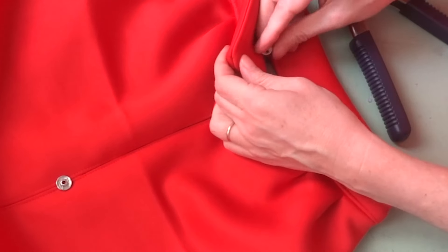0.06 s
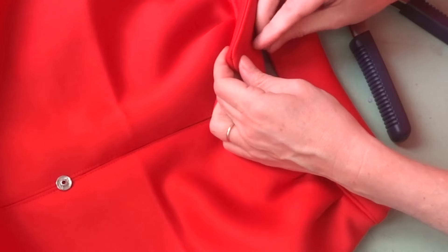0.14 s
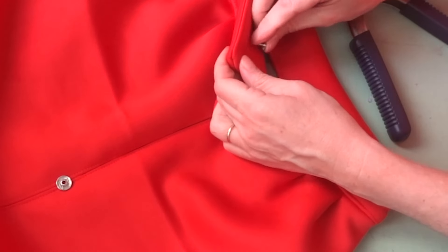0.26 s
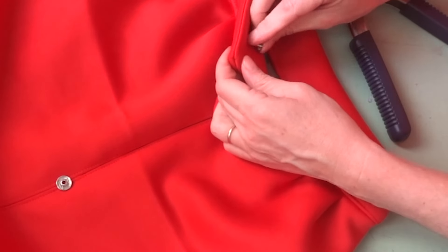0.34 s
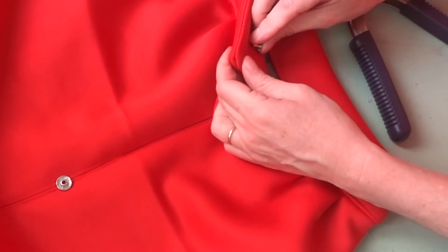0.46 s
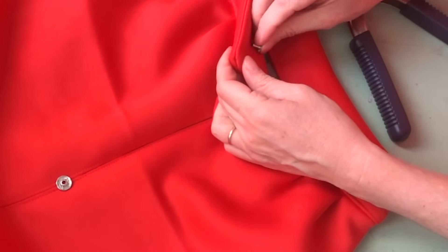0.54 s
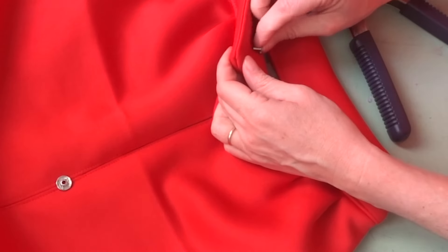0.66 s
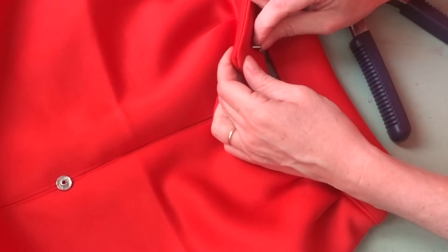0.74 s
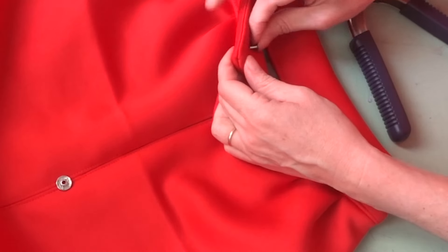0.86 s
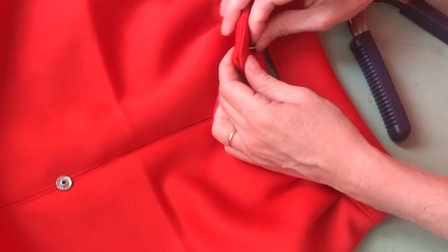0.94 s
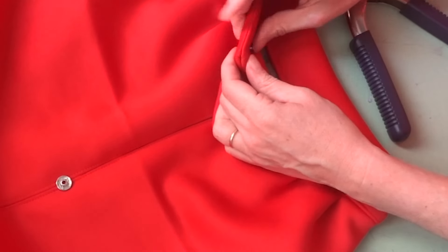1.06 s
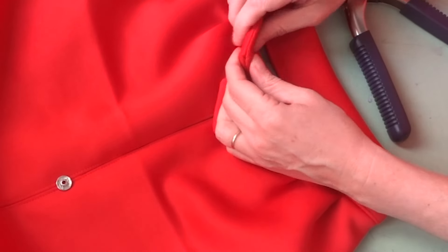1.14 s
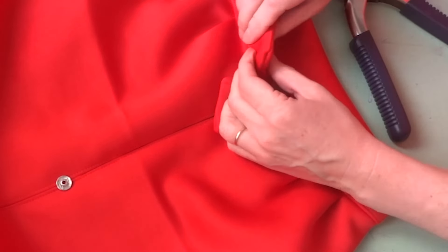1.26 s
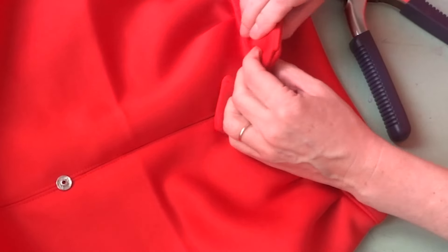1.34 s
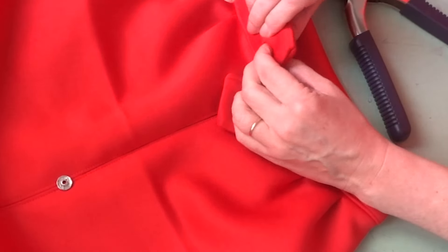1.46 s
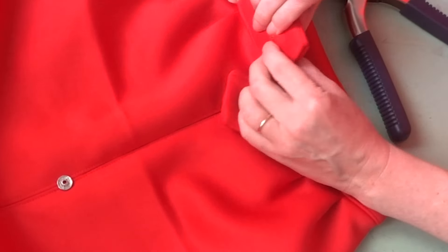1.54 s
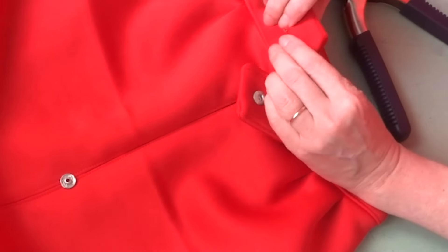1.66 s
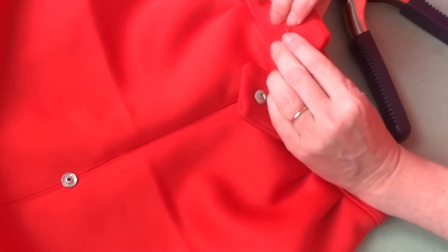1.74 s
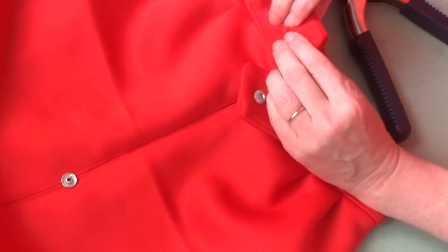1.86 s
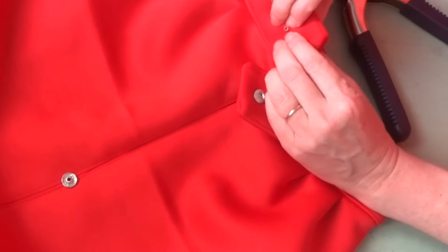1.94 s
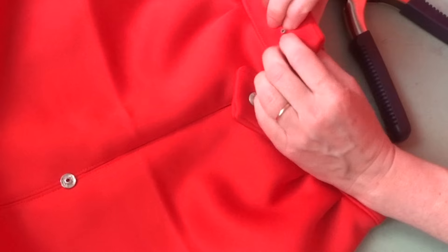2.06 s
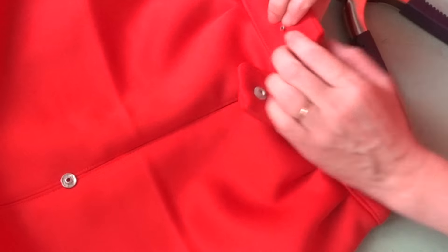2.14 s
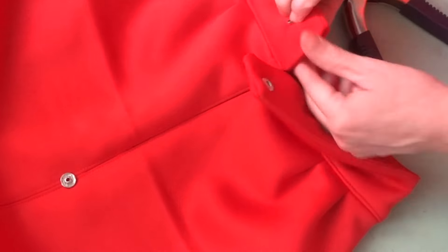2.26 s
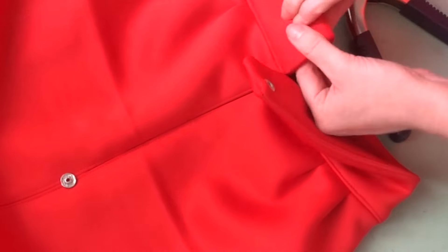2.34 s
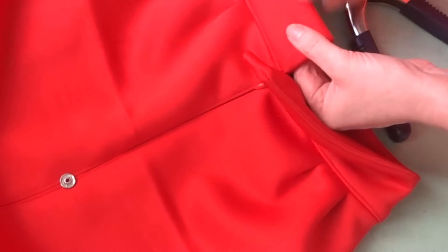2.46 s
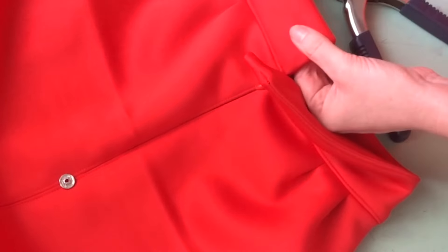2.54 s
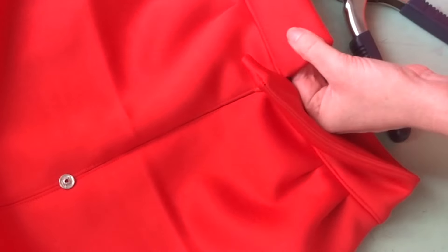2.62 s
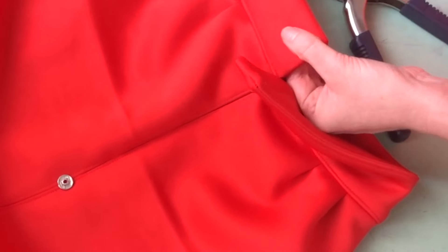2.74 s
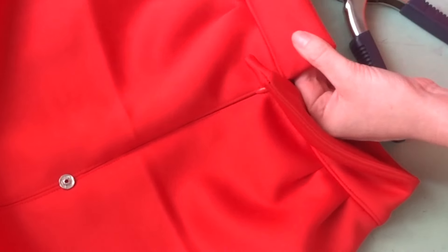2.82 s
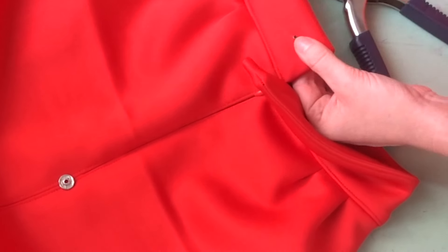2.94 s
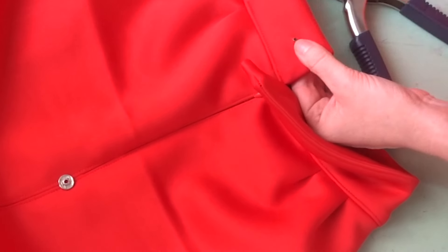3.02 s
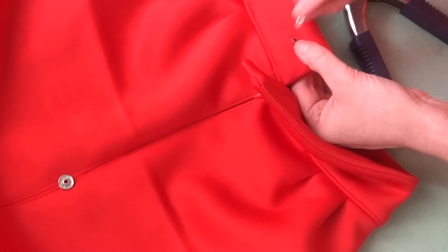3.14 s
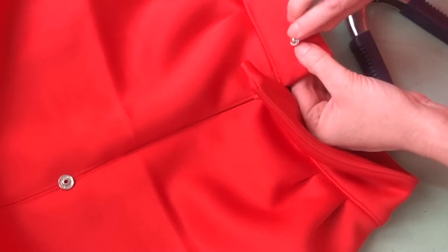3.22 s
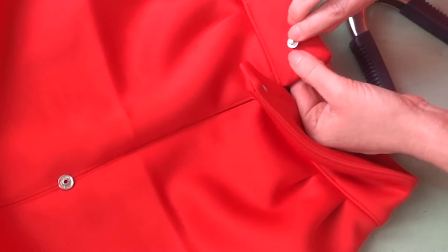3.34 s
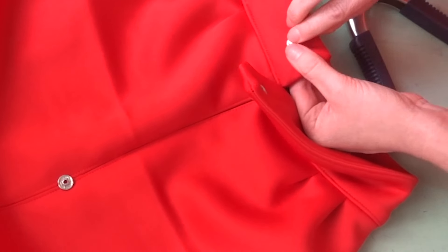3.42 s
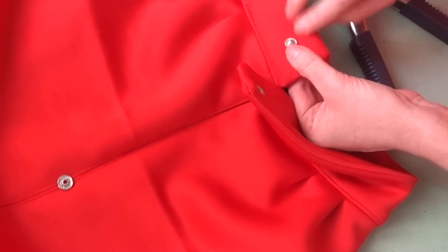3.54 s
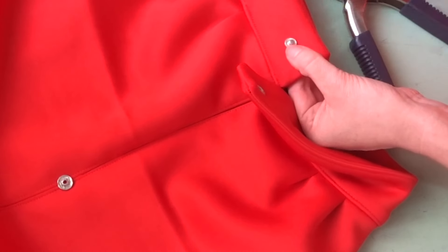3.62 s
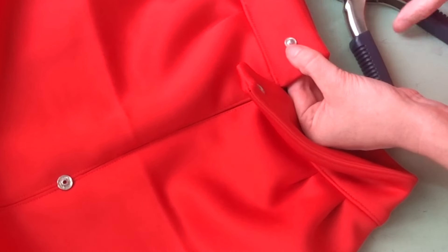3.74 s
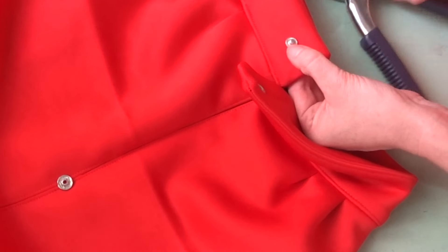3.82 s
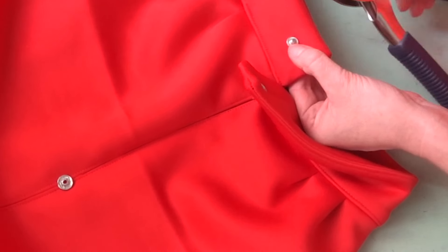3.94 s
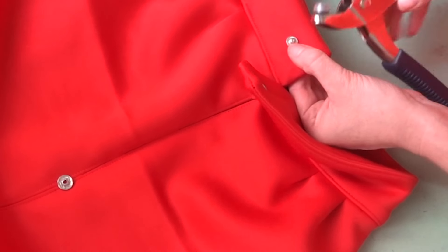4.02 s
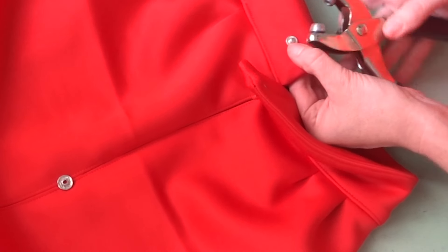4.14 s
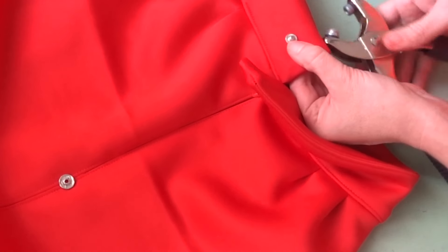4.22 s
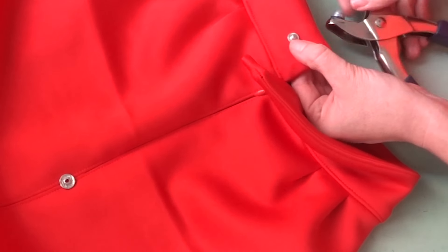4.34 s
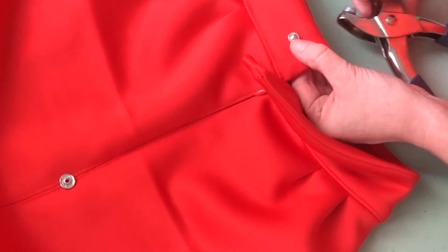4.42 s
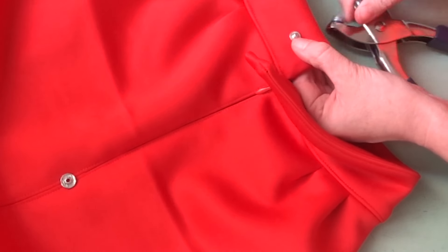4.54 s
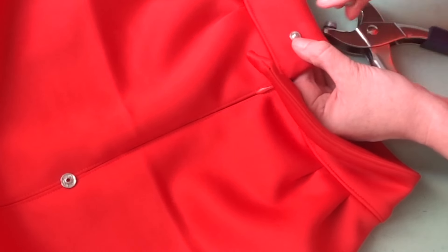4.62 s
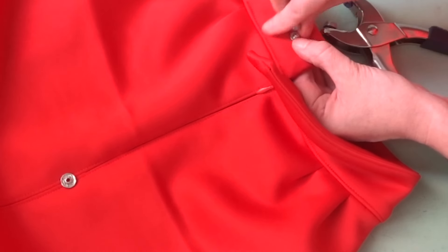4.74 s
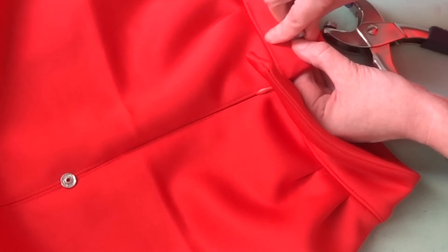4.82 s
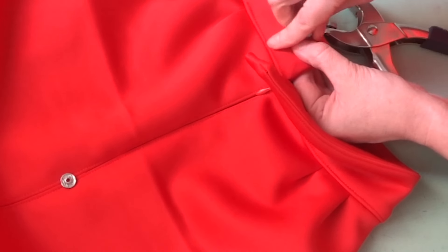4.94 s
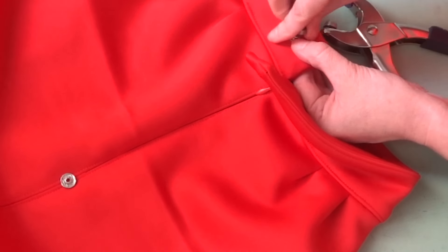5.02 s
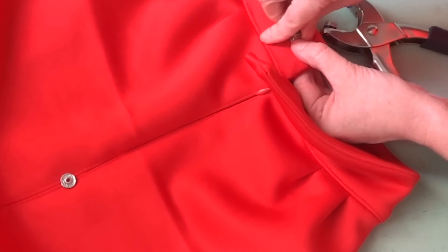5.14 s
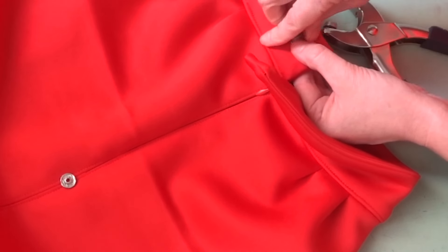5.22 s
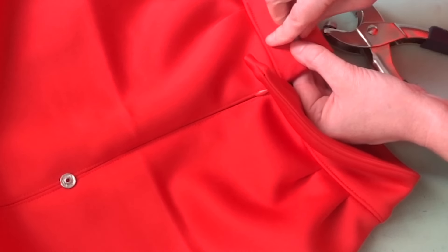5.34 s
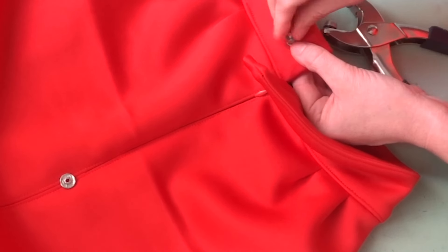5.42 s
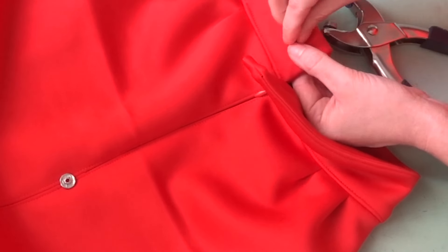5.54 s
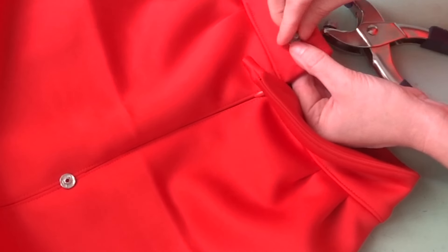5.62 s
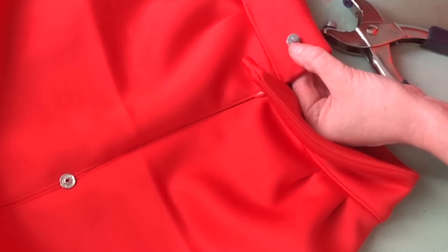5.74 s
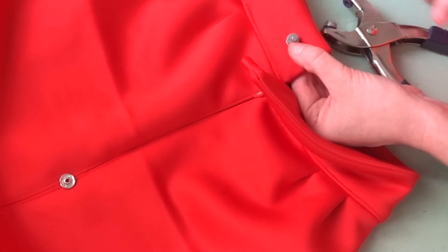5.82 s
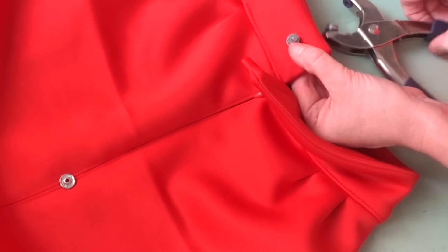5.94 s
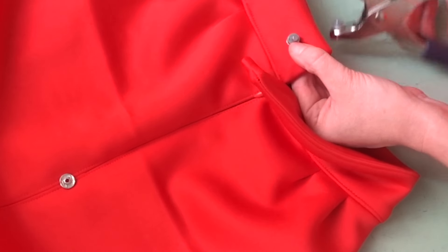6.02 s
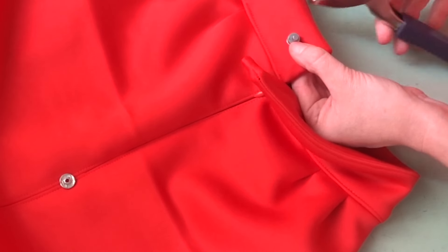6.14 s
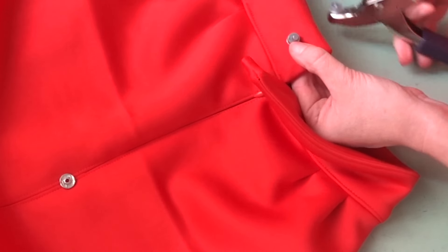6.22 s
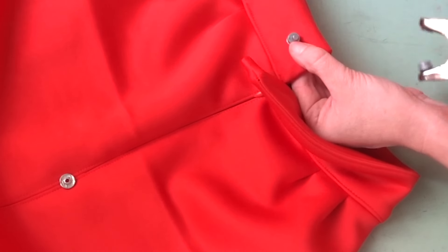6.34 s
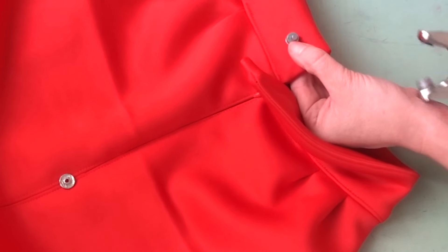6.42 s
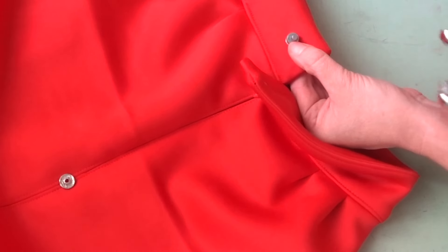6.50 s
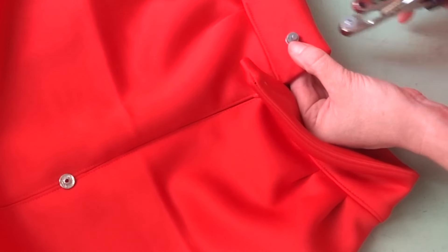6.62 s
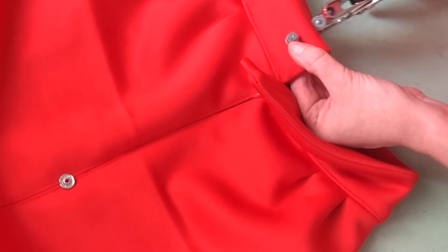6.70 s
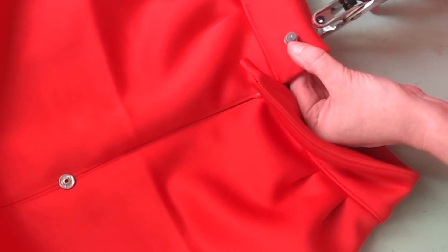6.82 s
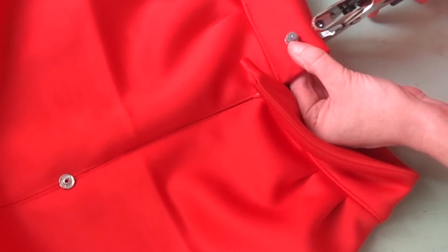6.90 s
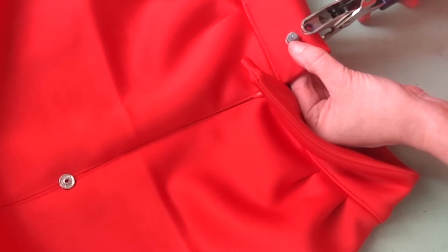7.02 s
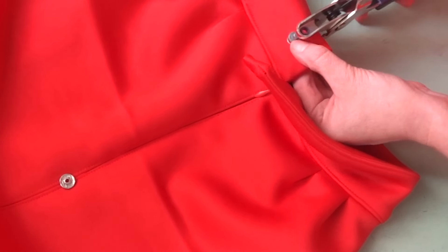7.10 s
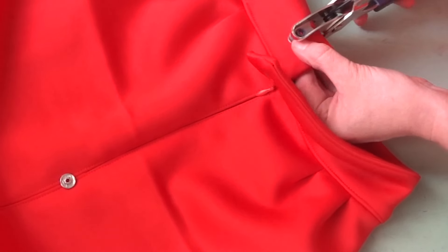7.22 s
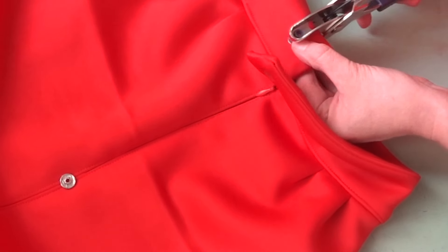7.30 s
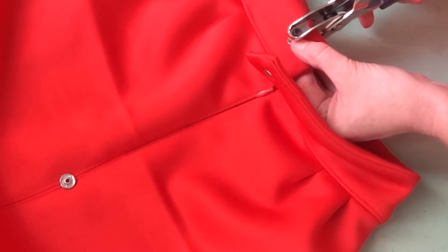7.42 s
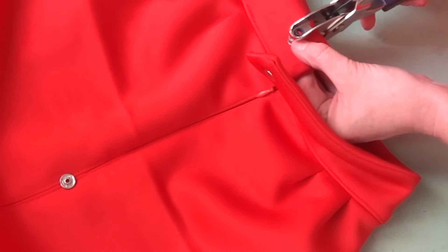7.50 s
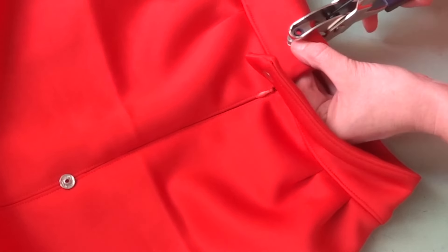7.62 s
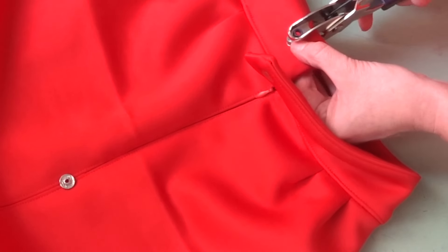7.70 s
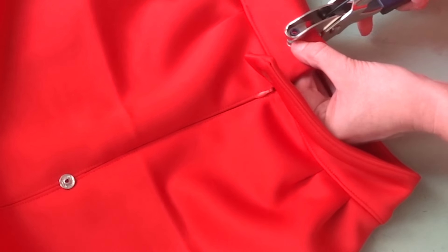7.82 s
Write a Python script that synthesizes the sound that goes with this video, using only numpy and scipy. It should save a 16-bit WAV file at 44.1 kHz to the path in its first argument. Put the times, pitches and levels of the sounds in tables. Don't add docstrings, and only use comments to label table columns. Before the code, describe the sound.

Close rustling of thick rubbery cloth under hands, then hard metal pliers knock and clatter on a table, followed by quiet fine handling.

```python
import sys
import numpy as np
from scipy import signal
from scipy.fft import rfft, irfft, next_fast_len
from scipy.io import wavfile
from scipy.ndimage import uniform_filter1d

SR = 44100
rng = np.random.default_rng(int(sys.argv[2]) if len(sys.argv) > 2 else 0)


def makeup_ratio(level_db):
    decades = np.asarray(level_db, float) / 20
    return 10 ** decades


def int16_out(signal):
    q = np.round(np.clip(np.atleast_2d(signal).T, -1, 1) * 32767)
    wavfile.write(sys.argv[1], SR, q.astype(np.int16))


N = 346623


def read(points, hz):
    point_hz, value = np.transpose(points)
    return np.interp(np.log(hz), np.log(point_hz), value)


def colour(x, points):
    size = next_fast_len(x.shape[-1])
    hz = np.maximum(np.arange(size // 2 + 1) * SR / size, 1)
    spectrum = rfft(x, size) * makeup_ratio(read(points, hz))
    return irfft(spectrum, size)[..., :x.shape[-1]]


def unit(x):
    return x / np.sqrt(np.mean(x ** 2))


def band(x, low_hz, high_hz):
    return signal.sosfilt(signal.butter(2, [low_hz, high_hz], "band", fs=SR, output="sos"), x)


def walk(rate_hz):
    hold = int(SR / rate_hz)
    steps = np.repeat(rng.standard_normal(N // hold + 1), hold)
    return 1.338 * uniform_filter1d(uniform_filter1d(steps, hold), hold)[:N]


def add(out, start_s, x):
    i = int(start_s * SR)
    out[..., i:i + x.shape[-1]] += x[..., :N - i]


# frequency_hz, density_db (per Hz)
HISS_SPECTRUM = [(15, -40), (25, -17), (130, -8), (170, -21), (205, -9.5), (333, -8.5), (361, -15.5),
                 (449, -10), (486, -10), (769, -11), (929, -31), (1040, -13), (1870, -25.5), (4820, -25),
                 (15800, -36.5)]
# frequency_hz, level_db
HUM_LINES = [(199.2, -71), (446.8, -75.5), (527.6, -78.5), (651.4, -81), (780.6, -78)]


def background():
    hiss_db, rumble_db = -61.5, -79.5
    hiss = unit(colour(rng.standard_normal((2, N)), HISS_SPECTRUM))
    out = hiss * makeup_ratio(hiss_db + 0.87 * walk(3.03))
    rumble = unit(band(rng.standard_normal(N), 63, 85))
    out[0] += makeup_ratio(rumble_db + 1.1 * walk(1)) * rumble
    for hz, db in HUM_LINES:
        wandering_hz = hz * (1 + 0.00732 * walk(28))
        tone = np.sin(2 * np.pi * np.cumsum(wandering_hz) / SR)
        out[0] += makeup_ratio(db + 6.5 + 1.7 * walk(6.6)) * tone
    return out


REFLECTION_GAP_S = 0.0029
# frequency_hz, t60_s
ROOM_DECAY = [(150, 0.22), (600, 0.22), (2000, 0.29), (5000, 0.29), (12000, 0.24)]
# frequency_hz, level_db
ROOM_SPECTRUM = [(100, -9.5), (210, 4.5), (320, -8), (420, -7.5), (520, -0.5), (2500, -3), (6000, -4),
                 (12000, 0)]


def room():
    t = np.arange(SR // 2) / SR
    out = 0
    for hz in 100 * 2 ** np.arange(0, 7.3, 0.5):
        noise = band(rng.standard_normal((2, len(t))), hz / 2 ** 0.25, hz * 2 ** 0.25)
        out = out + noise * makeup_ratio(read(ROOM_SPECTRUM, hz) - 60 * t / read(ROOM_DECAY, hz))
    out = out * np.clip(t / REFLECTION_GAP_S - 0.2, 0, 1)
    return out / np.sqrt(np.sum(out[0] ** 2))


# frequency_hz, level_db, t60_s
TABLE_MODES = [(215.4, 1, 0.26), (454, -7.5, 0.19), (507.5, 2.5, 0.23), (628, -3.5, 0.22), (700, -1, 0.17),
               (767, -11, .22), (850, -10, 0.18), (949, -8, 0.12), (994, -4, 0.15), (1063, -0.5, 0.18),
               (1242, -0.5, 0.18), (1462, 2, 0.15), (1642, -2, .13), (2170, -3, .22)]


def table_top(scatter_db):
    t = np.arange(SR // 2) / SR
    hz, db, t60_s = np.transpose(TABLE_MODES)[:, :, None]
    scatter, phase = rng.standard_normal((2, len(hz), 1))
    decay = makeup_ratio(db + scatter_db * scatter - 60 * t / t60_s)
    modes = (decay * np.sin(2 * np.pi * (hz * t + phase))).sum(axis=0)
    return modes * np.clip(t / REFLECTION_GAP_S - 0.3, 0, 1) / 100


def blow(hz, cycles):
    turns = np.arange(SR // 8) * hz / SR
    envelope = (1 - np.exp(-turns / 0.55)) * np.exp(-turns / max(cycles, 0.3))
    x = -np.sin(2 * np.pi * turns) * envelope
    return x / np.abs(x).max()


def struck(start_s, db, contact, ring_db, air, out):
    table_db, room_db, contact_lag_s = -17, 0, 0.00112
    echo = makeup_ratio(room_db) * air
    echo[0] += makeup_ratio(table_db + 12.5) * table_top(scatter_db=2.5)
    sound = makeup_ratio(ring_db) * signal.fftconvolve(contact[None], echo, axes=1)
    sound[0, :len(contact)] += contact
    sound[1, :len(contact)] += 0.08 * contact
    add(out, start_s + contact_lag_s, makeup_ratio(db) * sound)


def blows(rows, gain_db, airs, out):
    for k, (start_s, db, hz, cycles, ring_db) in enumerate(rows):
        struck(start_s, db + gain_db, blow(hz, cycles), ring_db, airs[k % 3], out)


# start_s, peak_db, pitch_hz, contact_cycles, ring_db
HAND_PUSHES = [
    (2.882, -37.5, 124, 0.63, -2),
    (3.672, -44, 155, 0.65, -5.5),
    (3.209, -49, 134, 2, 6),
    (3.772, -41, 198, 1.1, -9),
    (7.794, -47.5, 314, 2.6, -20.5),
    (7.822, -47, 205, 1.5, -21),
    (7.852, -43, 179, 2.5, -5.5),
    (1.369, -42.5, 425, 1.5, 1),
    (2.059, -43.5, 634, 0.69, 3.5),
]
# start_s, peak_db, pitch_hz, contact_cycles, ring_db
CAP_ROCKS = [
    (3.1978, -37.5, 1585, 15, -13),
    (3.2096, -33, 1580, 12, -9),
    (3.228, -40, 1750, 9.3, -7),
    (3.247, -43.5, 1634, 17, -8),
]
# start_s, peak_db, pitch_hz, ring_db
SMALL_TICKS = [
    (1.9438, -41.5, 1800, -8),
    (3.7554, -44, 4000, -9),
    (3.837, -57, 5170, -8),
    (3.886, -41.5, 5650, -13),
    (4.1784, -46.5, 10700, -11),
    (4.4999, -42.5, 9840, -3.5),
    (4.579, -51.5, 5590, -15),
    (5.8686, -46.5, 9550, 4.5),
]


def light_contacts(airs, out):
    ticks = [(start_s, db, hz, 1.1, ring_db) for start_s, db, hz, ring_db in SMALL_TICKS]
    blows(ticks + HAND_PUSHES + CAP_ROCKS, 2.5, airs, out)


# start_s, peak_db, pitch_hz, contact_cycles, ring_db
TOOL_KNOCKS = [(3.921, -15.5, 760, 0.32, -1), (4.295, -12, 1150, 1.7, -3.5), (4.302, -12, 560, 1.7, -7),
               (4.3095, -14, 1150, 1.7, -6), (4.427, -11, 700, 0.38, -0.5), (4.444, -17, 1170, 1.2, -6),
               (4.617, -6.5, 780, 1.5, 0), (4.627, -11, 760, 0.95, 1.5), (4.6305, -12, 760, 0.74, -7),
               (4.641, -16.5, 910, 0.76, 4), (4.646, -13, 850, 1.1, -3), (4.653, -11, 800, 0.92, -1.5),
               (4.669, -17, 700, 1.1, -6), (6.004, -23.5, 590, 0.37, 2), (6.0105, -21.5, 560, 0.6, -3.5),
               (6.241, -24.5, 510, 0.19, -1), (6.313, -5, 756, 0.9, -13), (6.3228, -12.5, 680, .7, -9)]
# start_s, peak_db, pitch_hz, contact_cycles, ring_db
JAW_EDGES = [(3.924, -26, 1370, 1, -8.5), (4.2961, -10, 1540, 0.41, 6), (4.4293, -15.5, 1400, 1, -4),
             (4.6174, -19, 1360, 0.48, 12.5), (4.6404, -14.5, 1660, 0.78, 3), (6.2432, -36, 1220, 1, -4),
             (6.3131, -35.5, 1100, 0.36, 18.5), (3.9215, -26.5, 2430, 0.35, 4.5),
             (4.2946, -10, 2300, 0.42, 3), (4.4278, -17, 2320, 0.32, -2.5),
             (4.6179, -24.5, 3170, 0.38, 12.5), (6.3145, -36, 2590, 0.75, 0),
             (4.2945, -16.5, 4010, 1.9, -4), (6.313, -43, 1880, 1.3, -5)]


def tool_knocks(airs, out):
    blows(TOOL_KNOCKS, -2, airs, out)
    blows(JAW_EDGES, 2.5, airs, out)


# start_s, peak_db
STEEL_TICKS = [
    (3.92, -42),
    (4.295, -27),
    (4.427, -36),
    (4.617, -29),
    (4.627, -35),
    (4.641, -28.5),
    (6.004, -39.5),
    (6.313, -40),
]


def steel_ticks(airs, out):
    t = np.arange(SR // 8) / SR
    for k, (start_s, db) in enumerate(STEEL_TICKS):
        steel = band(rng.standard_normal(len(t)), 4000, 12000) * np.exp(-t / 0.0014)
        struck(start_s, db, steel, -1.3, airs[k % 3], out)


def hits():
    out = np.zeros((2, N))
    airs = [room() for spot in range(3)]
    light_contacts(airs, out)
    tool_knocks(airs, out)
    steel_ticks(airs, out)
    return signal.sosfilt(signal.butter(3, 109.4, "high", fs=SR, output="sos"), out)


def releases(rows):
    out = np.zeros((2, N))
    t = np.arange(SR // 2) / SR
    for start_s, db, hz, octaves, fade_s in rows:
        half = 2 ** (np.clip(octaves, 0.04, 4) / 2)
        noise = unit(band(rng.standard_normal((2, len(t))), hz / half, min(hz * half, 16000)))
        envelope = (1 - np.exp(-t / 0.00046)) * np.exp(-t / max(fade_s, 0.003))
        add(out, start_s, makeup_ratio(db - 12) * noise * envelope)
    return out


# start_s, peak_db, centre_hz,
# width_octaves, fade_s
BUZZES_AND_RINGS = [(6.241, -42.5, 9400, .35, .004), (6.242, -43.5, 3500, 1, .02), (6.256, -45, 2700, 1, .008),
                    (6.3135, -35.5, 10500, 0.22, 0.0033), (6.335, -48, 10700, .2, .02),
                    (6.32, -45.5, 4540, .15, 0.036), (6.318, -33, 2740, 0.25, .03), (4.30, -26, 1900, 0.19, .03),
                    (4.30, -20, 3500, 0.17, .035), (4.432, -26, 1900, .4, 0.027), (4.31, -34, 3830, .15, .04),
                    (4.70, -32.5, 840, 1.4, 0.087), (6.0105, -39, 8000, 1.5, .003), (6.123, -39, 900, 1.2, .012),
                    (5.999, -36, 700, 1, .004), (6.055, -42, 3280, 0.092, .04), (2.8, -40, 1620, .12, 0.023),
                    (3.674, -43.5, 2300, 1.7, 0.043), (3.835, -36, 3500, 2, .006), (4.43, -29, 1960, .5, 0.036),
                    (4.62, -26, 440, .2, 0.053), (6.318, -20, 515, .12, .035), (6.318, -19, 980, .5, .025),
                    (6.243, -32, 1250, .25, .03), (6.012, -27, 520, .15, .025), (6.011, -33, 1400, 1, .015)]


def buzzes_and_rings():
    return releases(BUZZES_AND_RINGS)


# start_s, peak_db, centre_hz, width_octaves, fade_s
CLOTH_SCUFFS = [(0.138, -35.5, 4760, 1.1, 0.019), (0.185, -28.5, 2520, 2.6, 0.03),
                (0.364, -28, 2930, 1.1, 0.043), (0.404, -28, 1200, 1.4, 0.06), (.5, -33, 1200, 1.5, .05),
                (0.65, -40, 1176, 0.67, 0.035), (0.791, -36, 4120, 1.2, 0.083),
                (0.846, -30, 2770, 2.5, 0.019), (0.95, -36, 4400, 1.2, 0.015),
                (1.125, -32.5, 3700, 1.6, 0.015), (1.36, -33, 4730, 1.6, 0.027),
                (1.499, -38, 3100, 1.3, 0.02), (1.585, -25, 2300, 1.3, 0.019),
                (1.626, -24, 2400, 1.9, .018), (1.783, -30.5, 1980, 1.8, 0.014),
                (1.815, -32, 2200, 1.7, .012), (1.875, -33.5, 2680, 1.2, .012),
                (1.9445, -31, 1500, 2, .006), (2.057, -28, 600, 1.2, 0.02), (2.103, -35, 1200, 1.7, 0.016),
                (2.305, -27, 3300, 1.6, 0.012), (2.578, -49, 4050, 3.2, 0.039),
                (2.676, -29.5, 2010, 2.8, 0.014), (2.884, -26, 1750, 2.2, 0.046),
                (2.893, -26, 1800, 1.5, 0.038), (3.756, -34.5, 1220, 1.6, 0.012),
                (3.884, -26, 3100, 0.7, 0.012), (5.023, -41.5, 842, 3.8, 0.018),
                (5.12, -35, 1310, 1.7, 0.038), (5.61, -44, 2130, 1.5, 0.052),
                (7.721, -40, 1250, 0.75, 0.024)]
# start_s, peak_db,
# centre_hz, width_octaves, fade_s
RUBBER_DRAGS = [(5.788, -35, 1200, 0.35, 0.04), (5.867, -43.5, 1250, 0.32, 0.11),
                (7.643, -45, 1273, 0.097, 0.049), (4.7, -41, 690, .06, .15), (.41, -36, 6400, .12, .05),
                (.498, -29, 3830, 0.088, .03), (.795, -41, 8300, 0.114, 0.026),
                (.84, -37, 3400, 0.17, 0.061), (.85, -38.5, 6360, .15, 0.045),
                (.95, -35, 4700, 0.24, 0.029), (2.915, -28, 3390, 0.1, 0.025), (2.895, -30, 1760, .12, .04),
                (2.89, -30, 1020, 0.23, .04), (3.1, -33, 554, .15, .03), (2.9, -35, 4600, .1, .03),
                (2.91, -34, 2810, 0.08, 0.04), (5.26, -47.0, 2090, 0.19, 0.095),
                (5.0, -49, 2080, 0.16, 0.063), (6.04, -41, 4055, 0.099, 0.0405),
                (6.035, -39.5, 10000, 0.63, 0.045), (3.883, -38.5, 10200, .4, 0.012)]


def scuffs():
    return releases(CLOTH_SCUFFS + RUBBER_DRAGS)


def swells(t, rows, linger=1):
    peak_s, db, rise_s, fall_s = np.transpose(rows)[:4, :, None]
    before = (peak_s - t) / np.maximum(rise_s, 0.005)
    after = (t - peak_s) / np.maximum(fall_s, 0.005)
    away = np.where(t < peak_s, before, after)
    return makeup_ratio(db - 20 * away / linger) ** 2


# peak_s, effort_db, rise_s, fall_s, fold_db
CLOTH_STROKES = [(0.02, -44, 0.48, 0.12, -5.5), (.21, -41, 0.077, 0.33, -7.5), (.3, -46, .06, .08, -6),
                 (.42, -43, 0.1, 0.3, -8), (.545, -36, 0.25, 0.1, -7.5), (.665, -46, 0.028, 0.081, -21),
                 (.86, -50, 0.32, 0.23, -0.5), (1.12, -57, 0.2, 0.28, -2), (1.35, -51.5, 0.11, 0.13, 0),
                 (1.52, -50.5, 0.091, 0.095, -2.5), (1.632, -37.5, 0.056, 0.11, -6),
                 (1.79, -52, 0.012, 0.3, 1), (1.89, -49, 0.12, 0.06, -3), (2.12, -49.5, 0.03, 0.12, 2),
                 (2.38, -35.5, 0.079, 0.1, -5.5), (2.58, -41, 0.011, 0.079, -2),
                 (2.68, -48, 0.032, 0.11, -5.5), (2.928, -36.5, 0.07, 0.062, -5),
                 (3.08, -55.5, 0.086, 0.14, 1.5), (3.21, -52.5, 0.12, 0.063, 3), (3.42, -59, 0.22, 0.22, 4),
                 (3.76, -50, 0.018, 0.12, 2), (3.845, -49, 0.12, 0.14, -1)]
# peak_s, effort_db, rise_s, fall_s, fold_db
TOOL_HANDLING = [(4.136, -61, 0.066, 0.25, 5.5), (4.25, -56, 0.021, 0.16, 2.5),
                 (4.52, -60.5, .03, 0.51, 4.5), (5.029, -68.5, 0.012, 0.23, 11),
                 (5.143, -47, 0.12, 0.074, -12), (5.332, -58.5, 0.44, 0.099, -3),
                 (5.61, -67, .025, 0.69, 0), (5.812, -58.5, 0.051, 0.099, 3.5),
                 (5.885, -60, 0.027, 0.15, 8.5), (6.046, -49.5, 0.11, 0.12, -1), (6.14, -70, .1, 0.077, 11),
                 (6.5, -68.5, 0.075, 0.43, -1), (6.878, -63.5, 0.013, 0.13, -1),
                 (7.176, -68, .02, 0.14, -2), (7.4, -64, 0.029, 0.51, -1.5),
                 (7.652, -53.5, 0.011, 0.058, -16), (7.724, -51.5, 0.02, 0.14, -10),
                 (7.76, -57.5, 0.089, 0.058, 0), (7.86, -68.5, .2, .1, 7)]
# peak_s, weight_db, rise_and_fall_s
HAND_LEANS = [(0.0, -56, 0.13), (.22, -62, 0.7), (.51, -53, 0.24), (.82, -53.5, 0.28), (1.62, -56, 0.11),
              (1.88, -56, 0.41), (2.1, -49, 0.17), (2.421, -40.5, 0.042), (2.58, -57, .08),
              (2.68, -48.5, 0.069), (2.91, -51, 0.088), (3.212, -55.5, 0.091), (3.67, -56, 0.22),
              (3.881, -58, 0.19), (4.25, -59, .06), (5.0, -62, .1), (6.03, -52, 0.12), (7.81, -45.5, 0.042)]


def controls():
    rest_db, rest_fold_db, rest_lean_db = -84, -68, -71
    cloth_hiss_db, finger_hiss_db = -7, -10
    t = np.arange(0, N + 64, 64) / SR
    rows = CLOTH_STROKES + TOOL_HANDLING
    counts = [len(CLOTH_STROKES), len(TOOL_HANDLING)]
    hiss_db = np.repeat([cloth_hiss_db, finger_hiss_db], counts)[:, None]
    fold_db = np.array(rows)[:, 4:]
    strokes = swells(t, rows)
    slow_strokes = swells(t, rows, linger=1.216)
    leans = swells(t, [row + row[-1:] for row in HAND_LEANS])
    effort = strokes.sum(axis=0) + makeup_ratio(rest_db) ** 2
    hiss = (strokes * makeup_ratio(hiss_db) ** 2).sum(axis=0) + makeup_ratio(rest_db) ** 2
    fold = (slow_strokes * makeup_ratio(fold_db) ** 2).sum(axis=0) + makeup_ratio(rest_fold_db) ** 2
    push = leans.sum(axis=0) + makeup_ratio(rest_lean_db) ** 2
    powers = [effort, hiss / effort, fold / effort, push / effort]
    return [np.interp(np.arange(N) / SR, t, 10 * np.log10(p)) for p in powers]


def slips(share, spread_db):
    slipping = rng.random(N) < share
    size_db = spread_db * np.minimum(rng.exponential(size=N), 3.5)
    return 0.77 + slipping * makeup_ratio(size_db)


def patch(sizes, low_hz, high_hz):
    return band(sizes * rng.standard_normal((2, N)), low_hz, high_hz)


# frequency_hz, density_db (per Hz)
WEAVE_SPECTRUM = [(710, -20.5), (1200, -17.5), (1320, 1.5), (2330, 3), (3540, 4), (6580, -3.5),
                  (7900, -8.5), (15500, -23.5)]


def cloth():
    effort_db, hiss_db, fold_db, push_db = controls()
    sizes = slips(share=0.05, spread_db=2.5)
    weave = np.zeros((2, N))
    for low_hz in 1500 * 1.277 ** np.arange(6):
        level_db = read(WEAVE_SPECTRUM, 1.13 * low_hz) + 1.7 * walk(60)
        weave += makeup_ratio(level_db) * patch(sizes, low_hz, 1.277 * low_hz)
    hiss = colour(patch(sizes, 7800, 16300), WEAVE_SPECTRUM)
    folds = patch(slips(share=0.022, spread_db=4), 408, 1360)
    push = band(patch(slips(share=0.0041, spread_db=2.5), 164, 470), 124, 297)
    out = unit(weave)
    out += makeup_ratio(hiss_db + 1.4 * walk(30)) * unit(hiss)
    out += makeup_ratio(fold_db + 1.6 * walk(30.5)) * unit(folds)
    out += makeup_ratio(push_db + 2 * walk(16)) * unit(push)
    out = out * makeup_ratio(effort_db + 0.9 * walk(40)) + scuffs() + buzzes_and_rings()
    room_db = -13
    return out + makeup_ratio(room_db) * signal.fftconvolve(out[:1], room(), axes=1)[:, :N]


# frequency_hz, level_db
PORT_DIFFERENCE = [(60, -16), (200, -28), (380, -13), (700, -11), (1290, -10.5), (3200, -6), (8120, -0.5),
                   (15000, 4)]


def scene():
    left_db = 0.5
    mid, side = background() + hits() + cloth()
    side = colour(side, PORT_DIFFERENCE)
    return np.array([(mid + side) * makeup_ratio(left_db / 2), (mid - side) * makeup_ratio(-left_db / 2)])


def band_limit(x):
    return signal.sosfilt(signal.butter(12, 16650, fs=SR, output="sos"), x)


def record(dry):
    top_cut = signal.ellip(10, 0.2, 60, 15830, fs=SR, output="sos")
    mix = signal.sosfilt(top_cut, dry)
    return band_limit(mix)


dry = scene()
out = record(dry)
int16_out(out)
```